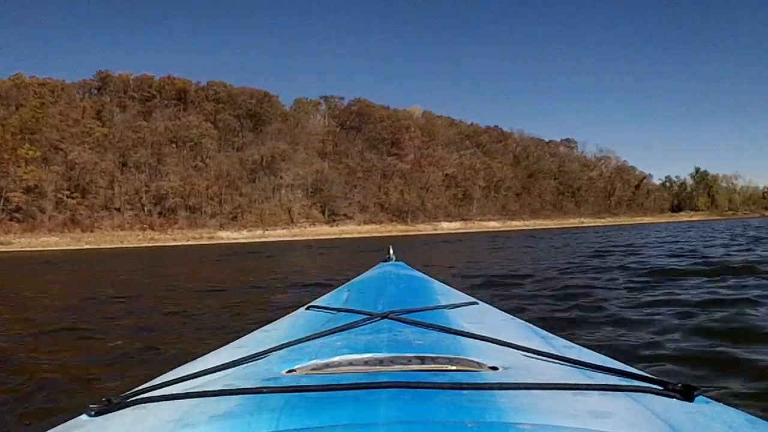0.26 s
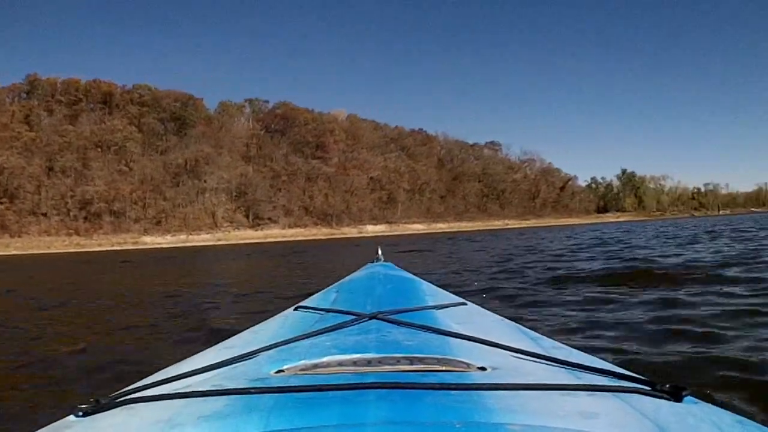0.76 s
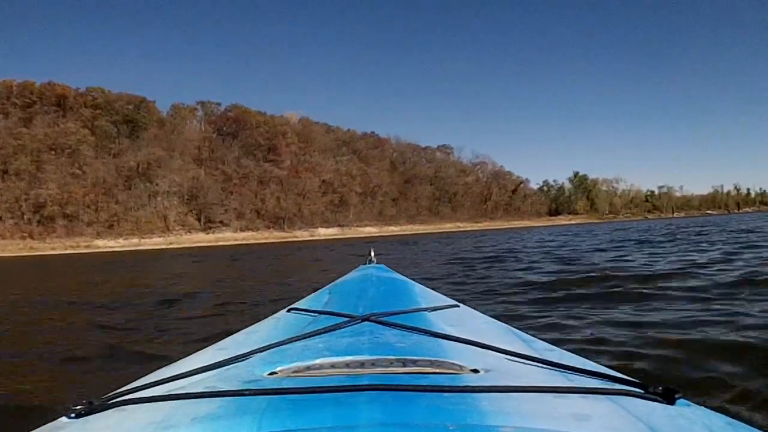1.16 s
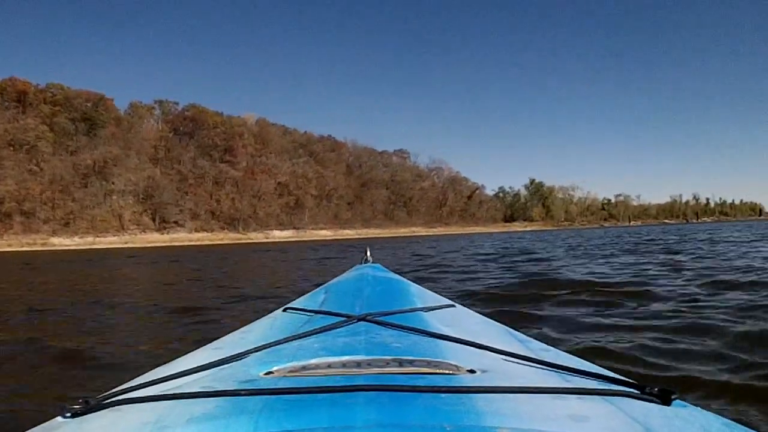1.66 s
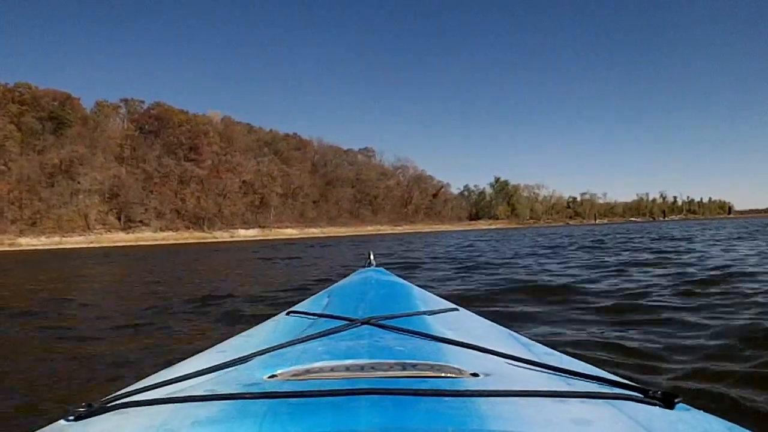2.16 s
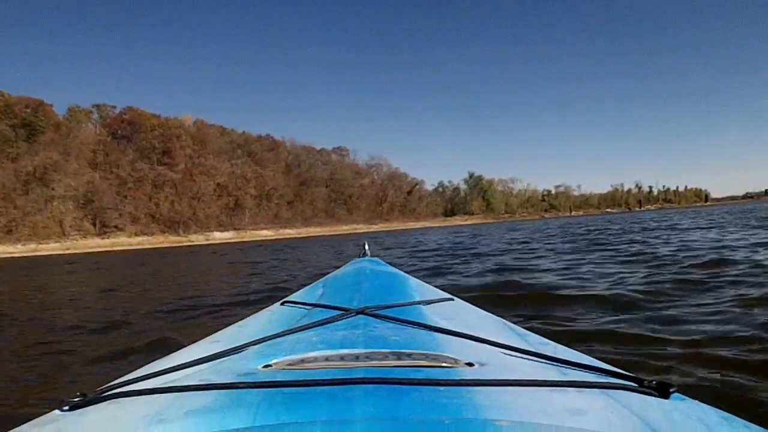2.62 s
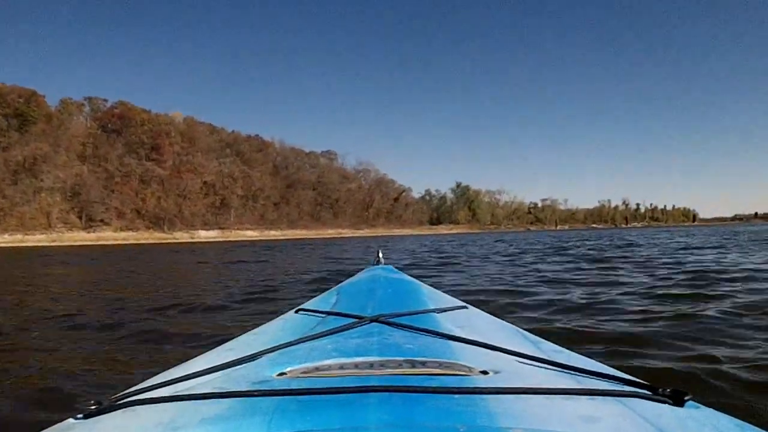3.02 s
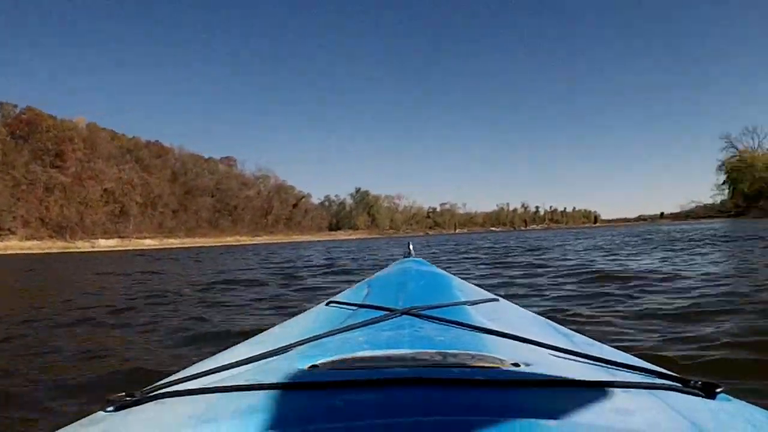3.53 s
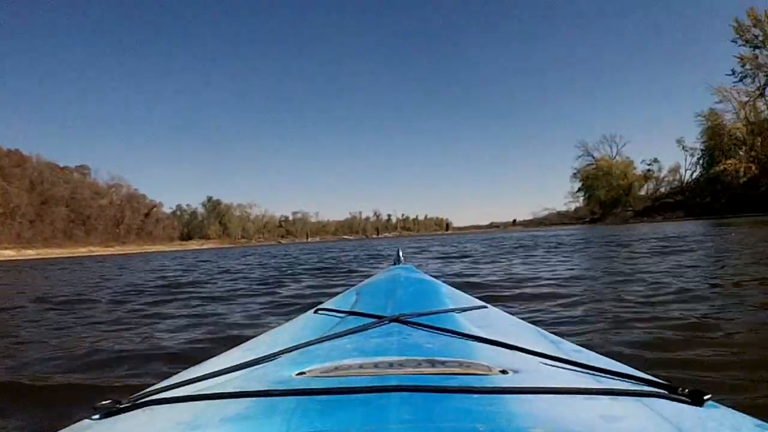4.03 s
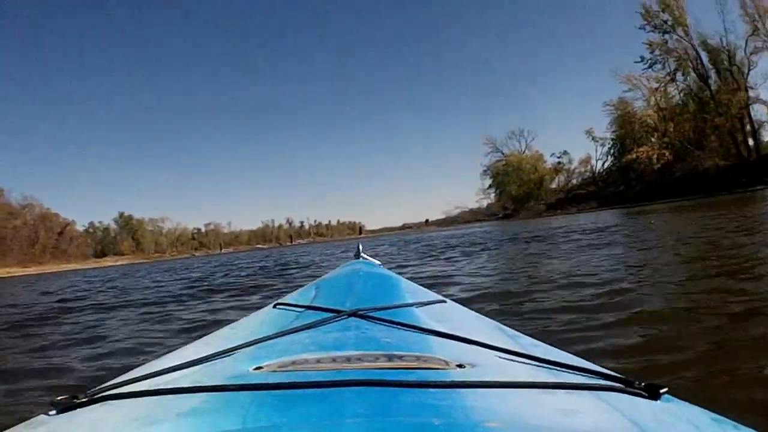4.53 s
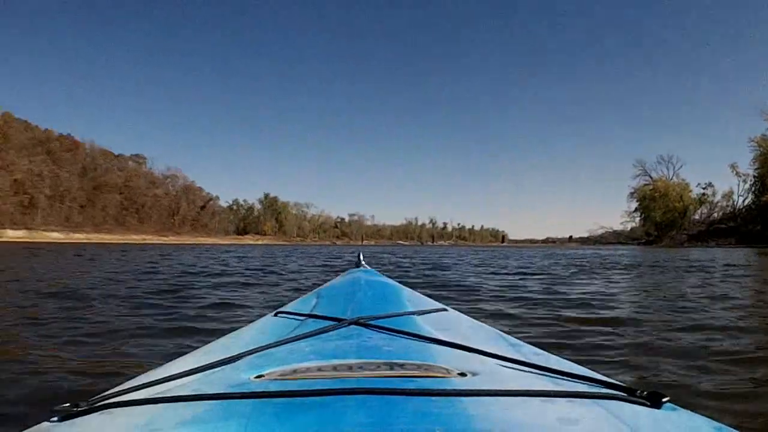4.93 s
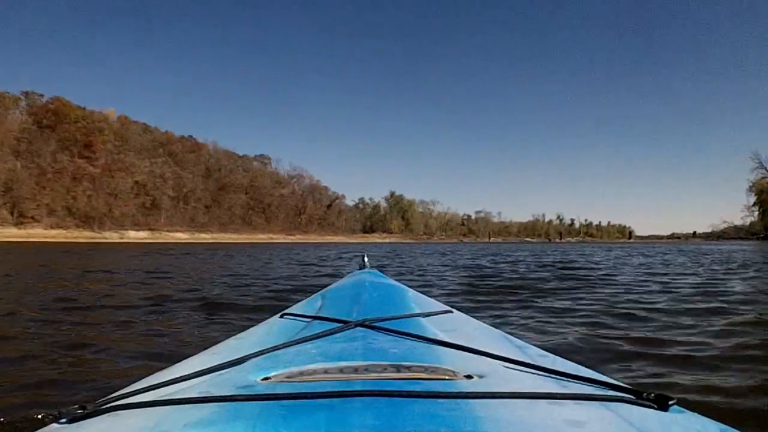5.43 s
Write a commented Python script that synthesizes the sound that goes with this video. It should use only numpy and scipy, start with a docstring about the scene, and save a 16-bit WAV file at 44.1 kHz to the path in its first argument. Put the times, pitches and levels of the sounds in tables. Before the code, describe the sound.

Close by a plastic kayak, quiet lapping and plinking droplets give way to surging, fizzy paddle splashes, with muffled wind buffeting underneath.

```python
"""A kayak on choppy water, heard by a microphone in a sealed housing. Earlier churn is calming at the start, with drips
and bubbles plinking by the hull: bent damped sines and sharp pulses. Wavelets then wash past, until a paddle goes in
near 3 s and breaks the water into foam, gulps and fizz: crowds of tiny bubbles over noise, swelling in surges.
Wind and hull rumble as lumpy low noise throughout, and the microphone adds a flickering high hiss."""
import sys
import numpy as np
from scipy import signal
from scipy.fft import rfft, irfft, next_fast_len
from scipy.io import wavfile
from scipy.ndimage import map_coordinates

SR = 44100
rng = np.random.default_rng(int(sys.argv[2]) if len(sys.argv) > 2 else 0)


def file_out(sig):
    """Save sig as 16-bit WAV at sys.argv[1]."""
    # one column per channel
    cols = np.atleast_2d(sig).T
    # limit, then scale
    lim = np.clip(cols, -1, 1)
    pcm = np.round(lim * 32767).astype(np.int16)
    wavfile.write(sys.argv[1], SR, pcm)


N = 250488

# Wind and hull rumble over time: (time [s], deep buffeting level [dB], hull boom level [dB])
RUMBLE_LEVELS = [(0.0, -43, -38.5), (0.36, -56.5, -60), (0.55, -43.5, -54.5), (0.71, -68, -65),
                 (0.85, -55, -60), (1.3, -63, -61.5), (1.74, -63.5, -51.5), (1.96, -57, -58),
                 (2.25, -48, -57.5), (2.52, -54.5, -51), (2.9, -45.5, -61.5), (3.32, -62, -59),
                 (3.55, -44.5, -45.5), (3.76, -50, -52.5), (3.86, -43.5, -56), (4.2, -42.5, -54),
                 (4.41, -61.5, -60), (4.59, -38.5, -46), (4.69, -48, -41.5), (4.8, -50.5, -57),
                 (4.9, -51, -60), (5.1, -52, -46), (5.68, -60, -57)]
# Drops smacking the surface or hull: (first touch [s], blow before its spectrum [dB])
SMACK_EVENTS = [(0.17, -32.5), (0.219, -32), (0.2505, -26), (0.3265, -35), (0.3734, -33), (0.754, -22),
                (1.2225, -32), (1.233, -37), (2.136, -28), (2.9893, -30.5), (3.0315, -31), (3.1175, -36),
                (3.1378, -27), (3.182, -12), (3.2186, -26), (3.3403, -20.5), (3.4342, -22), (3.7847, -30),
                (4.0336, -22), (4.0577, -19), (4.244, -23), (4.4718, -12.5), (4.5497, -15.5), (4.8788, -17),
                (4.979, -15.5), (5.0745, -10), (5.1883, -21.5)]
# The clearest bubbles, drops and air pockets under the hull:
# (time [s], starting pitch [Hz], level before the housing [dB], life [cycles], pitch rise over the life [share])
NEAR_BUBBLES = [(0.002, 110, -32, 2.5, 0), (0.023, 3240, -47, 11, 0), (0.05, 117, -30.5, 3.5, 0),
                (0.071, 3530, -38.5, 7.9, 0), (0.017, 260, -38, 1.5, 0), (0.062, 270, -36, 1.5, 0),
                (0.087, 740, -49, 15, 0.4), (0.088, 1030, -53, 16, .25), (0.13, 2650, -53, 10, 0.013),
                (0.135, 115, -36.5, 4.5, -0.013), (0.148, 796, -43.5, 5.3, 0.028),
                (0.17, 2600, -45.5, 8, .25), (0.192, 1900, -51, 12, 0), (0.219, 2950, -44, 12, .03),
                (0.224, 2400, -48, 8, 0), (0.242, 1030, -48.5, 7.8, 0), (0.248, 1900, -45, 7, .05),
                (0.249, 2900, -43, 8, .1), (0.252, 4479, -43, 5.6, 0), (0.3, 940, -53.5, 24, 0),
                (0.3, 1900, -51, 16, -0.0026), (0.328, 3970, -45, 6.7, 0), (0.352, 1660, -52, 26, .07),
                (0.373, 2710, -41, 11, -0.028), (0.381, 1290, -48.5, 10, 0), (0.419, 2970, -46.5, 8.5, 0),
                (0.447, 1770, -44.5, 17, .02), (0.611, 2760, -53, 8, 0), (0.698, 1770, -51, 6, 0),
                (0.709, 2370, -45, 5.9, 0), (0.723, 3260, -45, 7.5, 0), (0.748, 3250, -52, 12, 0),
                (0.7545, 2890, -30, 1.6, 0), (0.755, 845, -48, 24, 0.16), (0.888, 3190, -53, 9, 0),
                (0.977, 1400, -52, 11, .03), (1.2157, 3460, -45, 6.6, 0.032), (1.2172, 1150, -31.5, 2, 0),
                (1.223, 1750, -49, 7, -.3), (1.229, 1550, -55, 9, 0), (1.288, 1850, -47, 2, -0.027),
                (1.288, 1354, -48.5, 22, -0.013), (2.136, 2900, -38, 11, 0), (2.138, 2420, -43, 11, 0),
                (2.142, 2950, -49, 14, -.1), (2.152, 2500, -51, 16, 0), (2.988, 3000, -45, 7, 0),
                (3.032, 1080, -45, 5, 0), (3.118, 3430, -36, 8.1, .03), (3.141, 4800, -43.5, 17, 0.023),
                (3.142, 3260, -38, 16, -.02), (3.1826, 1020, -17.5, 4.4, .03),
                (3.1826, 1600, -21, 2.2, 0.027), (3.183, 994, -34.5, 20, .02), (3.1955, 3500, -34, 8, 0),
                (3.21, 2010, -37, 8, .03), (3.283, 2700, -29.5, 13, .04), (3.301, 1550, -37, 7, 0),
                (3.308, 1420, -36.5, 12, .15), (3.341, 2650, -39, 12, 0), (3.413, 4220, -37, 28, -.03),
                (3.424, 2670, -30, 9, .05), (3.435, 3550, -32.5, 9, -0.014), (3.452, 750, -34.5, 7, -0.036),
                (3.482, 1650, -36.5, 14, 0), (3.502, 375, -29.5, 8.2, 0.036), (3.505, 276, -32.5, 9.7, 0),
                (3.509, 1000, -30, 2, 0), (3.525, 1720, -32, 8, 0), (3.567, 934, -27.5, 5.5, 0),
                (3.625, 310, -35, 5, 0), (3.689, 393, -29.5, 9.6, 0.027), (3.709, 2540, -34, 9, 0),
                (3.712, 933, -34.5, 12, .1), (3.782, 280, -36, 4.6, 0.094),
                (3.783, 640, -27.5, 7.8, -0.0078), (3.878, 3150, -27.5, 4.1, 0),
                (4.035, 1626, -34, 7.8, .03), (4.059, 3880, -34.5, 10, -0.001), (4.084, 970, -34.5, 5.9, 0),
                (4.086, 3000, -35, 7, 0), (4.245, 1310, -37, 4.8, 0), (4.287, 2800, -37.5, 16, 0.05),
                (4.303, 1664, -37, 9.9, 0.0043), (4.303, 1160, -35, 5, 0), (4.424, 2150, -29.5, 10.7, .02),
                (4.434, 2400, -35, 8.9, .1), (4.448, 4300, -40, 9, 0), (4.472, 2980, -27, 4.2, .07),
                (4.479, 4650, -27.5, 6, .05), (4.517, 2330, -35, 11, 0), (4.527, 1686, -33, 13, 0.04),
                (4.545, 4230, -28.5, 13, 0.02), (4.55, 205, -39, 14, 0), (4.55, 2500, -21.5, 6, 0.012),
                (4.623, 2950, -35, 12, 0), (4.656, 370, -22.5, 3.6, 0), (4.667, 200, -28, 2, 0),
                (4.679, 4900, -29, 5.5, 0), (4.691, 1570, -25, 7.4, -0.021), (4.767, 2700, -28, 9.9, 0),
                (4.767, 780, -20.5, 6.6, 0.099), (4.768, 4800, -34, 8, -.05),
                (4.776, 1170, -29, 12, -0.012), (4.787, 930, -28, 12, .2), (4.797, 1150, -21, 4, .05),
                (4.879, 2800, -28, 3.8, 0), (4.88, 1300, -28, 3, 0), (4.91, 3390, -27.5, 11, 0),
                (4.926, 2960, -23, 5.9, 0), (4.94, 2700, -22.5, 5.1, 0.013), (4.981, 1806, -21, 7, 0),
                (4.995, 301, -32, 8, .02), (5.041, 1600, -30, 10, 0), (5.074, 5000, -36, 16, 0.023),
                (5.075, 210, -28, 5.8, 0), (5.105, 322, -28, 4.8, -0.017), (5.172, 300, -30.5, 4, 0.04),
                (5.188, 2570, -29, 9.3, .05), (5.249, 409, -32.5, 8.3, 0), (5.313, 750, -32, 6, -0.021),
                (5.468, 1580, -35, 8.1, 0), (5.472, 2710, -33, 8, 0), (5.513, 214.4, -37, 18, 0),
                (5.528, 3570, -35.5, 17, 0), (5.53, 620, -35, 7, 0), (5.56, 216, -36.5, 12.6, 0)]
# Wavelets along the hull, then splashes of the blade; levels are before clumping, and SURGE_SWING scales the 10 dB:
# (peak [s], time to gain the last 10 dB [s], time to lose 10 dB [s], slosh [dB], fizz [dB], spray [dB])
SURGE_EVENTS = [(0.0, .1, .2, -57, -59.5, -69), (0.27, 0.3, 0.35, -65, -59.5, -68),
                (0.5, 0.2, .2, -64, -69, -77), (1.6, 0.22, 0.34, -58, -58.5, -65.5),
                (2.05, 0.36, 0.16, -59.5, -60, -71.5), (2.59, 0.24, 0.35, -56.5, -57, -64.5),
                (3.06, 0.03, 0.25, -62, -59.5, -60.5), (3.21, 0.02, 0.08, -58, -48.5, -57),
                (3.3, 0.0047, 0.1, -59, -51, -61), (3.435, .09, .02, -47, -42, -55.5),
                (3.6, 0.1828, .3, -45.5, -44.5, -59), (3.83, .08, .2, -45, -40.5, -59),
                (4.08, 0.09, 0.1, -54, -46.5, -62.5), (4.3, 0.15, .1, -48, -50, -56),
                (4.47, 0.1, 0.1, -58, -51.5, -56.5), (4.57, 0.055, 0.25, -40.5, -47, -51),
                (4.77, 0.14, 0.11, -54, -37.5, -56), (4.92, 0.1136, 0.31, -47, -37.5, -55),
                (5.11, .22, 0.31, -36, -40, -55), (5.55, 0.13, 0.02, -43.5, -48.5, -61)]
# Water between surges, before clumping: (slosh [dB], fizz [dB], spray [dB])
CALM_LEVELS = [-68, -72.5, -76]
# How far each layer follows a surge's rise and fall: (slosh [dB per dB], fizz [dB per dB], spray [dB per dB])
SURGE_SWING = [0.95, 1.063, 0.67]

# Tone of the microphone's own noise: (frequency [Hz], relative level [dB])
HISS_TONE = [(5000, -17), (7000, -1.5), (7800, -28), (8300, -12), (9000, -2.5), (13000, 0), (15100, -9.5),
             (15400, -40)]
# Tone of the wind on the housing: (frequency [Hz], relative level [dB])
BUFFET_TONE = [(10, -40), (22, 5.5), (40, 1), (65, -13.5), (100, -55)]
# Tone of the booming hull: (frequency [Hz], relative level [dB])
HULL_TONE = [(40, -33), (65, 4.5), (100, -3.5), (160, -7.5), (260, -17.5)]
# Tone of a smacking drop: (frequency [Hz], gain [dB])
SMACK_TONE = [(300, -34), (800, -6.5), (3000, 7), (5000, -8.5), (7700, -24.5), (10000, -27), (15000, -45)]
# Muffling of the near bubbles by the housing: (frequency [Hz], gain [dB])
HOUSING_TONE = [(20, -0.5), (4500, 0), (6500, 1), (8000, -12), (16000, -20)]
# Tone of the big sloshing bubbles: (frequency [Hz], relative level [dB])
SLOSH_TONE = [(110, -4), (200, -3.5), (400, -1.5), (700, -2), (1200, -19.5)]
# Tone of the small fizzing bubbles: (frequency [Hz], relative level [dB])
FIZZ_TONE = [(500, -17), (900, -3), (1800, -2), (3000, -3.5), (4500, -15.5)]
# Tone of the finest spray: (frequency [Hz], relative level [dB])
SPRAY_TONE = [(2500, 2), (3600, -5), (5000, -7.5), (6500, -16), (7600, -35), (9000, -26)]
# Tone of stray bubbles and pattering drops: (frequency [Hz], relative level [dB])
PLINK_TONE = [(250, -5), (600, 2), (2800, -1), (5500, -12)]

BAND_LIMIT_HZ = 16274
SMACK_LAG_S = 0.0008  # from first touch to the peak of a smack
ONSET_TURNS, ONSET_S = 0.3, 0.0001  # a bubble's onset time constant is the sum of both
PLINK_DB, PATTER_DB = -11, -8.5  # stray clear bubbles and ticking drops, relative to the fizz
SETTLE_S = 0.99  # time constant of the earlier churn calming down
BLADE_IN_S, BREAK_S = 2.934, 0.15  # when the blade enters, and how long it takes to break the surface
PADDLE_CHURN = 0.81  # how broken the blade keeps the surface [0-1]
SPLAT_S = 0.002  # time a flung handful of water takes to peak on landing


def amp(db):
    """Gain of a level in dB."""
    return 10 ** (np.asarray(db) / 20)


def unit(x):
    """Scale a signal to rms 1."""
    return x / np.sqrt(np.mean(x ** 2) + 1e-20)


def along(points, hz):
    """Read a spectrum in dB on a log frequency axis; -120 dB beyond its ends."""
    point_hz, level_db = np.transpose(points)
    return np.interp(np.log(hz + 1), np.log(point_hz + 1), level_db, left=-120, right=-120)


def curves(rows):
    """Draw one sample-by-sample line for each column after the time."""
    s, *columns = np.transpose(rows)
    return [np.interp(np.arange(N) / SR, s, column) for column in columns]


def wobble(rate):
    """Smooth random curve through `rate` knots a second."""
    knots = rng.standard_normal(int(N * rate / SR) + 4)
    return map_coordinates(knots, [np.arange(N) * rate / SR])


def coloured(x, spectrum):
    """Filter a signal through a spectrum."""
    m = next_fast_len(N + 8192)
    gain = amp(along(spectrum, np.fft.rfftfreq(m, 1 / SR)))
    return irfft(rfft(x, m) * gain, m)[:N]


def noise(spectrum):
    """White noise filtered to a tone."""
    return coloured(rng.standard_normal(N), spectrum)


def blips(s, hz, gain, cycles, rise, rough, size):
    """Bubbles as damped sines whose pitch bends ever faster, by the share `rise` over their life."""
    sample = np.arange(size)
    turns = sample / SR * hz[:, None]
    age = turns / cycles[:, None]
    # the ring fades gently at first, then ever faster
    decay = np.exp(-0.9 * age - 0.31 * age ** 2)
    onset = (1 - np.exp(-turns / (ONSET_TURNS + ONSET_S * hz[:, None]))) ** 2
    end_fade = np.minimum(1, (size - sample) / 64)
    # the bubble's wall wobbles, so phase and strength stray from cycle to cycle: one knot every two turns
    knots = rng.standard_normal((len(s), 2, 400))
    row = np.arange(len(s))[:, None]
    step = np.minimum(turns / 2, 398)
    low, part = step.astype(int), step % 1
    sway, flutter = [knots[row, k, low] * (1 - part) + knots[row, k, low + 1] * part for k in range(2)]
    # integrating a pitch of hz * (1 + rise * age ** 2) gives the third
    phase = 2 * np.pi * turns * (1 + rise * age ** 2 / 3) + rough * sway
    strength = gain[:, None] * decay * onset * end_fade * (1 + 0.5 * rough * flutter)
    wave = strength * np.sin(phase)
    at = np.round(s * SR).astype(int)[:, None] + sample
    return np.bincount(at.ravel(), wave.ravel(), N + size)[:N]


def foam(spectrum, lo_hz, hi_hz, cycles, spread_db, share, count, size):
    """Random uneven bubbles blended with noise for those too far off to tell apart; `share` is the crowd's power."""
    u = rng.random((count, 5))
    s = u[:, 0] * N / SR
    hz = lo_hz * (hi_hz / lo_hz) ** u[:, 1]
    boost_db = spread_db * np.minimum(-np.log(1 - u[:, 2]), 3.1)
    gain = amp(boost_db) / np.sqrt(cycles / hz)  # evens out the energy of low and high bubbles
    life = cycles * (0.39 + 2.34 * u[:, 3])
    rise = 0.3 * u[:, 4:] ** 2
    crowd = unit(coloured(blips(s, hz, gain, life, rise, rough=0.35, size=size), spectrum))
    share = np.clip(share, 0, 1)
    far = unit(noise(spectrum))
    return np.sqrt(share) * crowd + np.sqrt(1 - share) * far


def microphone_hiss():
    """The microphone's own noise: high coloured noise whose level flickers."""
    return amp(-77 + 1.5 * wobble(10)) * unit(noise(HISS_TONE))


def rumble():
    """Wind buffets the housing in lumps; the hull booms as waves pass under it."""
    deep_db, hull_db = curves(RUMBLE_LEVELS)
    deep = unit(amp(1.1 * wobble(5.7)) * noise(BUFFET_TONE))
    hull = unit(amp(3.4 * wobble(14)) * noise(HULL_TONE))
    return amp(deep_db) * deep + amp(hull_db) * hull


def smacks():
    """A landing drop is a sharp pulse with a short noisy spatter behind it."""
    t = np.arange(2000) / SR
    blows = np.zeros(N + len(t))
    for s, db in SMACK_EVENTS:
        blow = 0.12 * amp(-60 * t / 0.03) * rng.standard_normal(len(t))  # spatter, losing 60 dB in 30 ms
        blow[0] = -1  # the pulse itself
        start = round((s + SMACK_LAG_S) * SR)
        blows[start:start + len(t)] += amp(db) * blow
    return coloured(blows[:N], SMACK_TONE)


def near_bubbles():
    """Bubbles heard one by one, muffled by the housing; long-lived ones ring more evenly."""
    s, hz, db, cycles, rise = np.transpose(NEAR_BUBBLES)
    cycles = np.clip(cycles, 1, 28)
    rough = np.minimum(0.06 + 2.3 / cycles, 0.7)
    ringing = blips(s, hz, amp(db), cycles, rise[:, None], rough[:, None], size=8000)
    return coloured(ringing, HOUSING_TONE)


def surface_churn():
    """How broken the surface is, 0-1: earlier churn calms down until the blade goes in."""
    t = np.arange(N) / SR
    earlier = np.exp(-t / SETTLE_S)
    paddled = PADDLE_CHURN * np.clip((t - BLADE_IN_S) / BREAK_S, 0, 1)
    return np.maximum(earlier, paddled)


def surges():
    """Gains of slosh, fizz and spray: each surge adds its power to the calm."""
    t = np.arange(N) / SR
    power = amp(CALM_LEVELS)[:, None] ** 2 * np.ones(N)
    for s, rise, fall, *peaks_db in SURGE_EVENTS:
        lost_db = 10 * np.maximum((s - t) / rise, (t - s) / fall)
        level_db = np.array(peaks_db)[:, None] - np.outer(SURGE_SWING, lost_db)
        power = power + amp(level_db) ** 2
    return np.sqrt(power)


def splats(count):
    """Quick swells that die within milliseconds, as flung water lands all at once; rms 1 about zero."""
    u = rng.random((count, 2))
    starts = np.bincount((u[:, 0] * N).astype(int), u[:, 1], N)
    age = np.arange(2000) / SR / SPLAT_S
    jumps = signal.fftconvolve(starts, age * np.exp(-age))[:N]
    return unit(jumps - jumps.mean())


def water():
    """Big bubbles slosh, small ones fizz, the finest spray; churn makes them grainier and clumps them together."""
    slosh_gain, fizz_gain, spray_gain = surges()
    churn = surface_churn()
    clumps = churn * (0.61 * wobble(14) + 0.7 * wobble(40))
    landings = clumps + 0.85 * churn * splats(count=300)
    slosh = foam(SLOSH_TONE, 170.7, 892, cycles=4.9, spread_db=4, share=0.6 * churn, count=2200, size=1500)
    fizz = foam(FIZZ_TONE, 743, 3732, cycles=4.4, spread_db=3.2, share=0.99 * churn, count=4200, size=500)
    spray = foam(SPRAY_TONE, 3290, 7570, cycles=3.1, spread_db=3.8, share=0.85 * churn, count=6000, size=250)
    plinks = foam(PLINK_TONE, 351, 5000, cycles=10, spread_db=1.5, share=0.99, count=1100, size=800)
    # small drops falling back ring for about one cycle, so they tick
    patter = foam(PLINK_TONE, 1010, 3500, cycles=0.92, spread_db=3.5, share=1, count=500, size=200)
    fizz_bed = fizz + churn * (amp(PLINK_DB) * plinks + amp(PATTER_DB) * patter)
    low = slosh_gain * amp(2.4 * clumps) * slosh
    mid = fizz_gain * amp(1.9 * landings) * fizz_bed
    high = spray_gain * amp(2.26 * landings) * spray
    return low + mid + high


def scene():
    """Everything reaches one microphone."""
    mix = rumble() + smacks() + near_bubbles() + water()
    return mix[None]


def record(dry):
    """The microphone adds its hiss; nothing passes from the band limit up."""
    m = next_fast_len(N + 8192)
    passed = np.fft.rfftfreq(m, 1 / SR) < BAND_LIMIT_HZ
    return irfft(rfft(dry + microphone_hiss(), m) * passed, m)[:, :N]


dry = scene()
out = record(dry)
file_out(out)
```